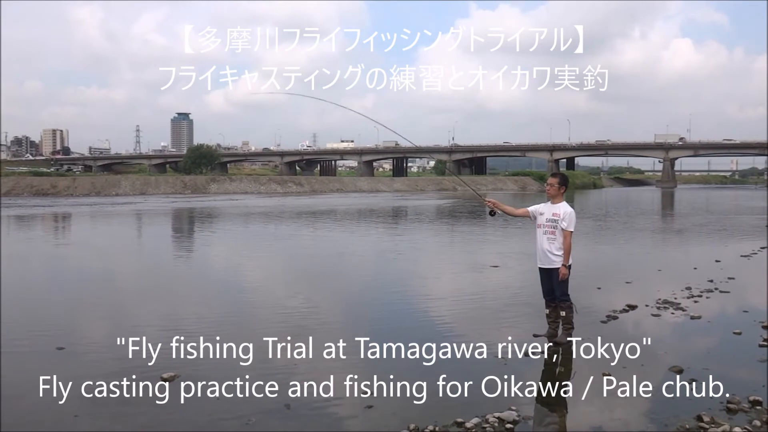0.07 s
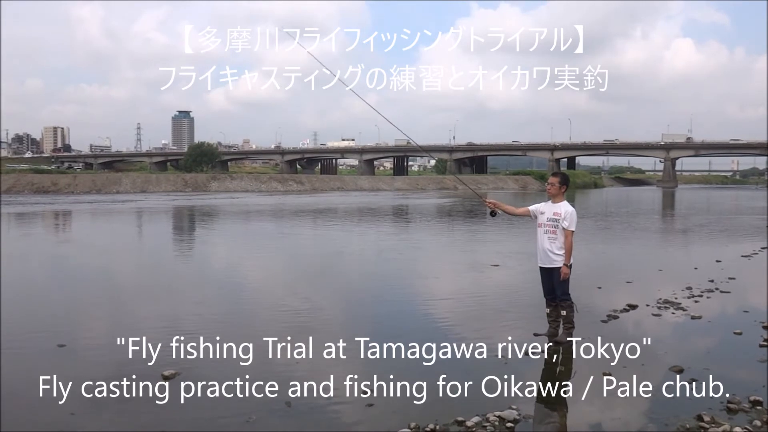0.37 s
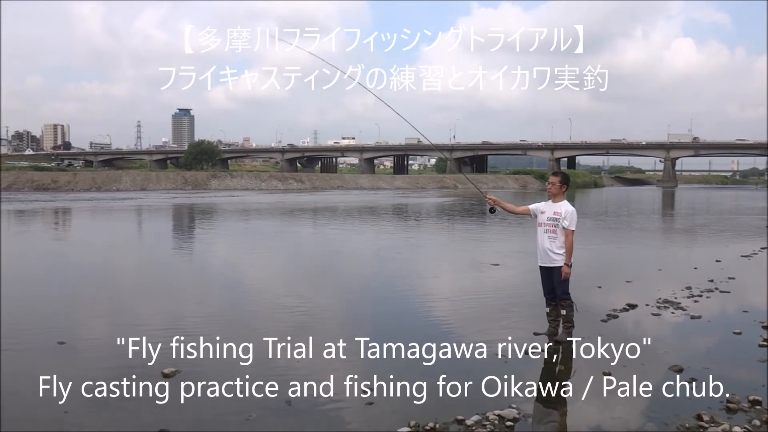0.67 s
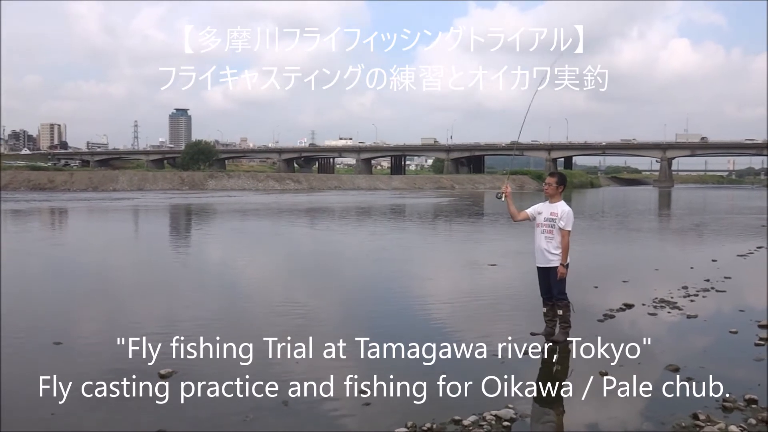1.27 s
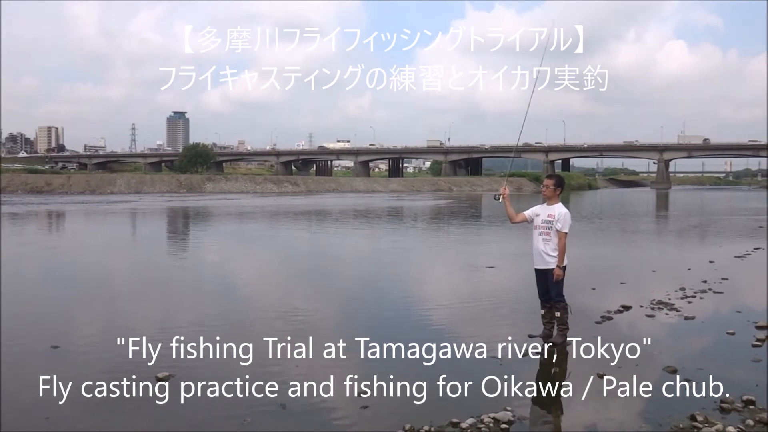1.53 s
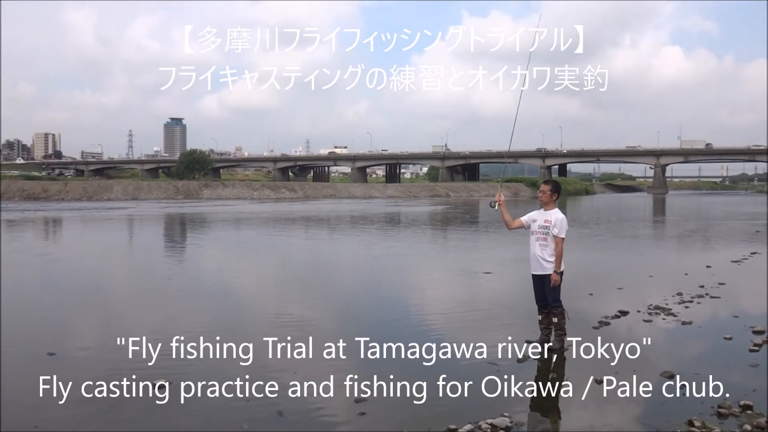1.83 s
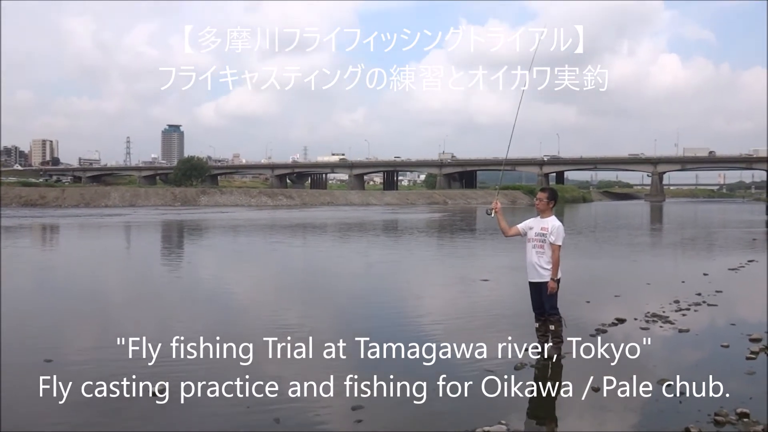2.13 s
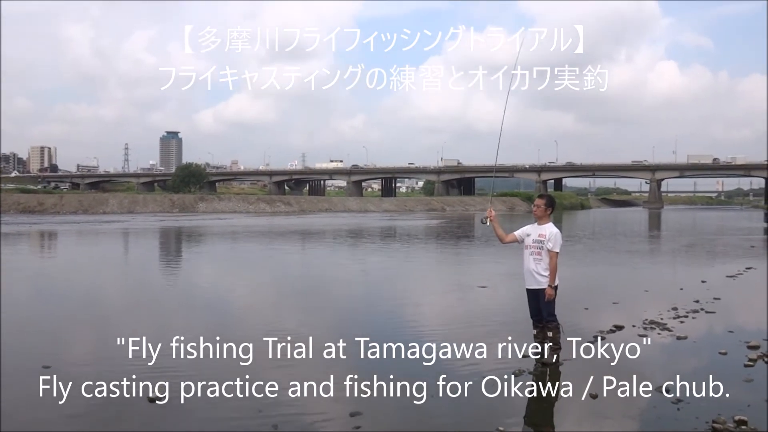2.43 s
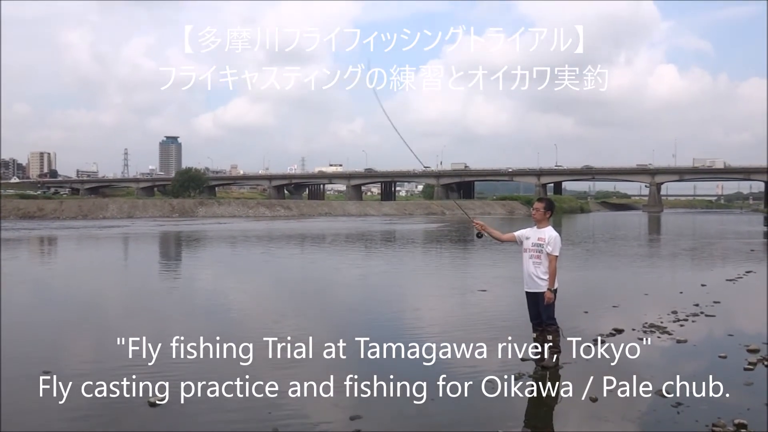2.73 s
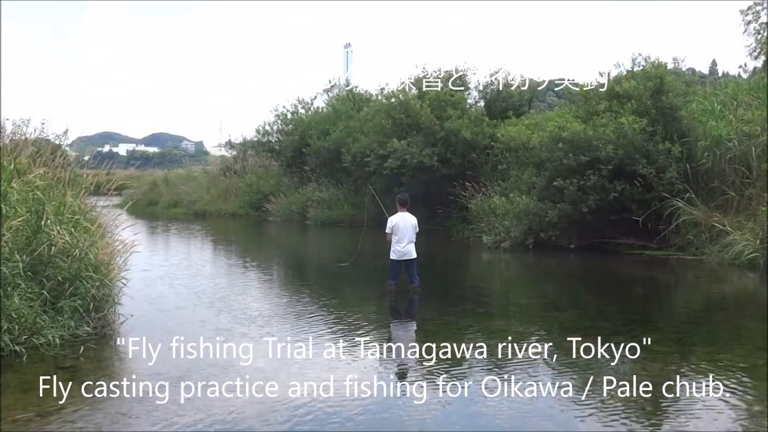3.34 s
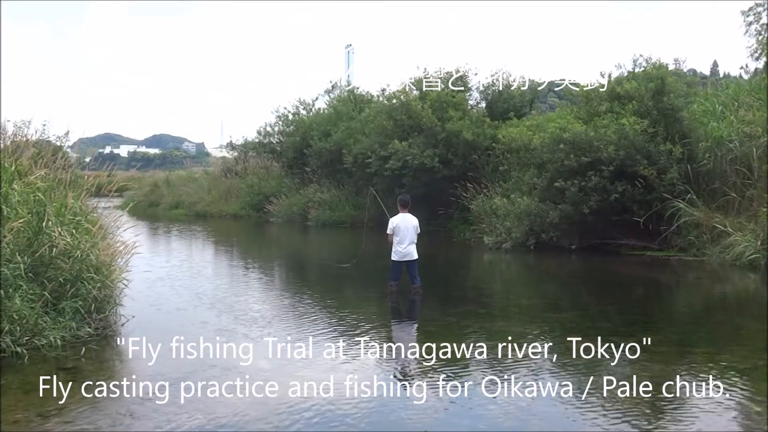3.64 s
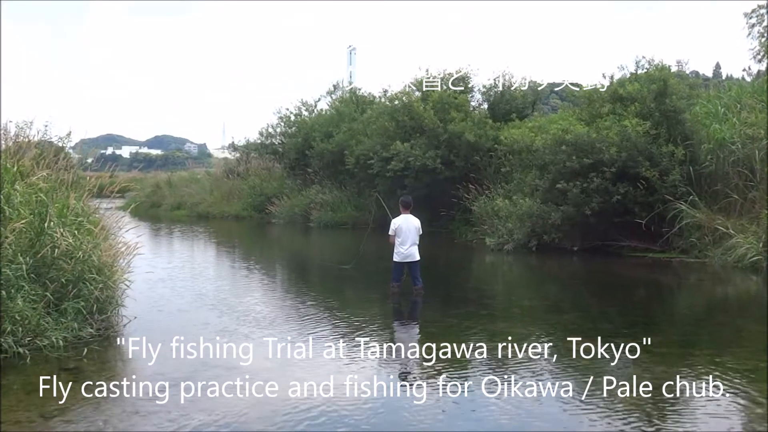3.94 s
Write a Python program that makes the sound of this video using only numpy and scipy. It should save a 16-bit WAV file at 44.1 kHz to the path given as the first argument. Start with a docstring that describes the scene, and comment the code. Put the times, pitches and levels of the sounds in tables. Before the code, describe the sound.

Traffic rumbles on a distant bridge over the hiss of a shallow river. A small bird chirps to the left, with thin metal squeals and close fishing tackle ticks. Everything cuts to silence, then a quiet stream fades in.

```python
"""Traffic rumbles and trucks drone on a road bridge, over the hiss of a wide shallow river below.
A small bird chips in pairs to the left, echoed by the water; far off, metal squeals and birds twitter.
Close to the microphone, fishing tackle ticks, the line brushes and the camera whines faintly.
The sound cuts to silence; then a quieter stream fades in, with soft low gusts, ringing bubbles,
a few drips, a far hum and one last tick."""
import sys
import numpy as np
from scipy import signal
from scipy.fft import rfft, irfft
from scipy.io import wavfile
from scipy.ndimage import uniform_filter1d

SR = 44100
rng = np.random.default_rng(int(sys.argv[2]) if len(sys.argv) > 2 else 0)


def persist_wave(psi):
    """Save psi, clipped to +-1, as 16-bit WAV."""
    counts = np.round(np.clip(psi, -1, 1) * 32767).astype(np.int16)
    wavfile.write(sys.argv[1], SR, np.atleast_2d(counts).T)


N = 176400
TIME, FREQS = np.arange(N) / SR, np.fft.rfftfreq(N, 1 / SR)
CUT_S, STREAM_START_S = 3.06, 3.512

# camera whine at the microphone: (frequency [Hz], level [dB])
WHINE_TONES = [(11568, -60.5), (11628, -60.5)]
# fishing line, close by: (peak time [s], swell [s], frequency [Hz], level [dB])
LINE_BRUSHES = [(.13, 0.016, 13800, -52), (.265, .015, 13440, -51), (0.351, .018, 14730, -50),
                (.425, 0.018, 13500, -49), (0.526, 0.019, 13600, -52), (0.638, .022, 13500, -48.5),
                (.72, .04, 14400, -49), (2.92, .03, 13600, -56.5), (3.018, .03, 13500, -48.5)]
# metal far off: (peak time [s], swell [s], pitch [Hz], level [dB])
METAL_SQUEALS = [(1.305, .03, 3670, -38.5), (1.36, .022, 6330, -32.5), (1.4, .018, 5720, -41.5),
                 (1.59, .03, 3640, -43), (1.808, .055, 3610, -28), (1.8, .025, 6440, -40),
                 (1.97, .05, 3597, -39.5), (2.3, .03, 6450, -39.5), (2.3, .025, 7440, -39.5),
                 (2.487, .04, 3660, -33.5), (2.57, 0.034, 3650, -45.5), (2.78, .06, 3650, -50.5)]

# low gusts and running water at the stream: (frequency [Hz], relative level [dB])
GUST_SPECTRUM = [(12, -38), (25, -6), (70, -1.5), (100, -5), (145, 3), (195, -10.5), (270, -6.5),
                 (330, -13), (460, -21), (1000, -49), (3000, -81)]
STREAM_SPECTRUM = [(20, -30), (300, -10), (550, 1), (700, -4), (950, -2), (1900, -0.5), (2500, -6.5),
                   (3600, -12), (4500, -11.5), (5700, -16), (6150, -2), (6700, -11), (8800, -9.5),
                   (9450, 1), (10100, -9), (14000, -13), (16000, -28)]
# stereo width of the stream: (frequency [Hz], side minus mid [dB])
STREAM_WIDTH = [(60, -27), (270, -14), (450, -3), (620, 0), (770, 8), (950, 5), (1220, 5.5), (1600, -6),
                (3000, -3), (6200, -4), (9500, -5), (14000, -17)]
# balance of the stream: (frequency [Hz], left minus right [dB])
STREAM_LEAN = [(100, -1), (1000, 0.5), (9000, -1)]
# the stream fading in: (time [s], gust level [dB], water level [dB])
STREAM_FADE = [(3.512, -76, -76), (3.53, -53, -59), (3.56, -44, -54.5), (3.61, -47, -49),
               (3.68, -43, -45.5), (3.85, -38, -44.5), (4.0, -31, -43.5)]
# drips at the stream: (time [s], pitch [Hz], level [dB])
STREAM_DRIPS = [(3.72, 4900, -46), (3.756, 4700, -42), (3.84, 4800, -46), (3.916, 4300, -44)]
# a hum far beyond the stream: (peak time [s], swell [s], pitch [Hz], level [dB])
FAR_HUM = [(3.87, 0.04, 273, -39.5)]

# bird on the left: (time [s], level [dB], echo level [dB], echo delay [s], left minus right [dB])
BIRD_CHIPS = [(.3213, -28.5, -27.5, .0035, 8), (.5245, -28.5, -30, .004, 9), (1.0677, -24, -29, .0038, 8.5),
              (1.2887, -21.5, -30, .0036, 8), (1.779, -28, -31, .0042, 5.5),
              (2.0082, -28.5, -27.5, .0042, 6), (2.479, -24.5, -24.5, .004, 6),
              (2.7137, -27.5, -33, .0038, 8)]
# one chip, a flick up and a slide down: (time [s], pitch [Hz], relative level [dB])
CHIP_SHAPE = [(0, 5800, -24), (.0007, 7200, 2), (.0016, 8100, 2.5), (.0026, 7200, 3), (.0036, 5600, -8.5),
              (.0055, 4884, -12), (.010, 4600, -6), (0.016, 4100, -26)]
# tackle close by: (time [s], level [dB], decay [s], centre frequency [Hz])
TACKLE_TICKS = [(.0858, -13, .0003, 6700), (.164, -21, 0.00053, 8000), (.202, -17, .0005, 8000),
                (.2033, -17.5, .0006, 7600), (.2316, -11.5, 0.00095, 7500), (0.235, -18.5, 0.012, 7600),
                (0.2399, -12.5, 0.00068, 7400), (.696, -24.5, .0008, 10000), (1.3683, -15, 0.0008, 8200),
                (3.9711, -24.5, 0.00062, 6400)]
# resonance of the tackle: (frequency [multiple of centre], relative level [dB])
TICK_COLOUR = [(.1, -34.5), (.45, -17), (.68, -22.5), (.86, -7.5), (1.0, 3.5), (1.2, -13), (1.4, -6),
               (1.65, -12.5), (2.2, -24.5)]

# truck engines on the bridge: (peak time [s], swell [s], pitch [Hz], level [dB])
TRUCK_DRONES = [(1, 0.14, 66, -29), (1.9, .6, 65, -29), (1.85, 0.22, 155, -30.5), (2.38, 0.25, 157, -29),
                (1.1, 0.56, 220, -35.5), (2.2, .25, 232, -30), (2.9, .25, 190, -29.5)]
# traffic rumble, tyre roar and river hiss: (frequency [Hz], relative level [dB])
RUMBLE_SPECTRUM = [(12, -38), (20, -9.5), (40, -6), (60, -1.5), (80, -1.5), (105, -2.5), (150, -1),
                   (200, -1.5), (260, -3.5), (330, -6.5), (420, -16.5), (700, -40.5), (2000, -72.5)]
ROAR_SPECTRUM = [(20, -51), (200, -19), (400, -2.5), (520, -1), (750, 2), (980, -3), (1340, -3), (1680, -7),
                 (2000, -7), (2700, -14), (4000, -20), (8000, -44), (16000, -71.5)]
HISS_SPECTRUM = [(20, -63), (1000, -23), (2800, -1), (4200, 0.5), (5800, -0.5), (6600, 1), (7700, 2.5),
                 (8500, -6), (9400, -6), (10600, 1.5), (11300, -8.5), (12100, -15), (13500, -10.5),
                 (14800, -13.5), (16000, -23)]
# level shifts as the traffic moves: (time [s], rumble [dB], roar [dB], hiss [dB])
TRAFFIC_FLOW = [(0, 0, -1.5, -1), (.5, -1, 0, -0.5), (1.0, -1, 0, 0), (1.55, 1.5, .5, 0.5), (2.1, -1, 0, 0),
                (2.7, -1.5, 0.5, 1), (3.05, 2.5, 0, 1.5)]
# stereo width below the bridge: (frequency [Hz], side minus mid [dB])
RIVER_WIDTH = [(25, -23.5), (65, -27), (200, -23.5), (320, -18), (500, -9), (800, -10.5), (1250, -7),
               (1800, -10), (3100, -3), (7500, -8.5), (9000, -16), (10500, -2.5), (12500, -22)]
# balance below the bridge: (frequency [Hz], left minus right [dB])
RIVER_LEAN = [(60, 0.5), (110, -0.5), (200, -0.5), (380, 0.5), (700, 1), (1290, 3.5), (2380, 5.5),
              (4400, 5.5), (8120, 1.5), (15000, 0.5)]


def amp(db):
    """Decibels to gain."""
    return 10 ** (np.asarray(db) / 20)


def unit(x):
    """Scales to rms 1."""
    return x / np.sqrt(np.mean(x ** 2) + 1e-20)


def spectrum_db(table):
    """Reads a spectrum table on a log-frequency axis."""
    hz, db = np.transpose(table)
    return np.interp(np.log(FREQS + 1), np.log(hz + 1), db)


def curves(table, t):
    """Reads every column of a time table."""
    times, *columns = np.transpose(table)
    return [np.interp(t, times, column) for column in columns]


def add(mix, start_s, sound, pan_db=0):
    """Places a mono sound in the stereo mix; positive pan is to the left."""
    part = mix[:, max(round(start_s * SR), 0):][:, :len(sound)]
    part += amp([[pan_db / 2], [-pan_db / 2]]) * sound[:part.shape[1]]


def tone(hz):
    """A sine that follows a pitch curve."""
    return np.sin(2 * np.pi * np.cumsum(hz) / SR)


def swell(peak_s, swell_s):
    """A bell-shaped rise and fall."""
    return np.exp(-((TIME - peak_s) / swell_s) ** 2 / 2)


def wander(rate_hz):
    """Slow random motion of rms 1, up to about the given rate."""
    return unit(irfft(rfft(rng.standard_normal(N)) * np.exp(-(FREQS / rate_hz) ** 2), N))


def wash(spectrum, width, lean, patchy_db, flutter_db):
    """Stereo noise with drifting patches of colour and a flutter shared by both channels."""
    mid, side = rfft(rng.standard_normal((2, N)))
    side *= amp(spectrum_db(width))
    left_gain = amp(spectrum_db(lean) / 2)
    stereo = irfft(np.array([(mid + side) * left_gain, (mid - side) / left_gain]), N)
    frames = signal.stft(stereo, nperseg=1024)[2]
    patches = uniform_filter1d(rng.standard_normal(frames.shape[1:]), size=9, axis=0)  # across frequency
    patches = unit(uniform_filter1d(patches, size=7, axis=1))  # across time
    patchy = signal.istft(frames * amp(patchy_db * patches), nperseg=1024)[1][:, :N]
    coloured = irfft(rfft(patchy) * amp(spectrum_db(spectrum)), N)
    return unit(coloured * amp(flutter_db * wander(19)))


def camera_whine():
    """Two faint, steady high tones from the camera, right at the microphone."""
    return sum(amp(db) * np.sin(2 * np.pi * hz * TIME) for hz, db in WHINE_TONES)


def fishing_line(half_band_hz=700):
    """Line drawn close by: friction gives short, very high whispers."""
    out = np.zeros(N)
    for peak_s, swell_s, hz, db in LINE_BRUSHES:
        band = rfft(rng.standard_normal(N)) / (1 + ((FREQS - hz) / half_band_hz) ** 2)
        out += amp(db) * swell(peak_s, swell_s) * unit(irfft(band, N))
    return out


def far_twitter(count, from_s=2.0, to_s=3.05, low_hz=4120, high_hz=6860, note_s=.035):
    """Birds far off to the left sing soft, short gliding notes."""
    out, progress = np.zeros((2, N)), np.arange(0, 1, 1 / (note_s * SR))
    for when, pitch, slope in rng.random((count, 3)):
        hz = low_hz * (high_hz / low_hz) ** (pitch ** 2)
        glide = 1 + .08 * (2 * slope - 1) * (progress - .5)
        note = np.sin(np.pi * progress) ** 2 * tone(hz * glide)
        add(out, from_s + when * (to_s - from_s), amp(-44.5) * note, pan_db=6.5)
    return out


def metal_squeals(waver=.0033, flutter_db=1.5):
    """Metal far off to the left: thin, unsteady tones swell and die away."""
    out = np.zeros((2, N))
    for peak_s, swell_s, hz, db in METAL_SQUEALS:
        squeal = tone(hz * (1 + waver * wander(150)))
        envelope = 1 / (1 + ((TIME - peak_s) / swell_s) ** 2 / 2) ** 2
        add(out, 0, amp(db + flutter_db * wander(40)) * envelope * squeal, pan_db=8.5)
    return out


def bubbles(count, low_hz=794, high_hz=3013, decay_cycles=7.9):
    """Small bubbles in the stream ring briefly, scattered left and right."""
    out, t = np.zeros((2, N)), np.arange(2048) / SR
    for when, pitch, strength, place in rng.random((count, 4)):
        cycles = t * low_hz * (high_hz / low_hz) ** pitch
        ring = np.sin(2 * np.pi * cycles) * (1 - np.exp(-cycles)) * np.exp(-cycles / decay_cycles)
        start_s = STREAM_START_S + when * (N / SR - STREAM_START_S)
        add(out, start_s, amp(-5 + 6 * strength) * ring, pan_db=10 * (place - .5))
    return out


def drips(rise_s=.00078):
    """Each drip is a tiny high ping, straight ahead."""
    out, t = np.zeros((2, N)), np.arange(1024) / SR
    envelope = t / rise_s * np.exp(1 - t / rise_s)
    for start_s, hz, db in STREAM_DRIPS:
        add(out, start_s, amp(db) * envelope * np.sin(2 * np.pi * hz * t))
    return out


def quiet_stream():
    """Beside the stream: soft gusts and bubbling water fade in, with a far hum and drips."""
    gust_db, water_db = curves(STREAM_FADE, TIME)
    gusts = wash(GUST_SPECTRUM, STREAM_WIDTH, STREAM_LEAN, patchy_db=3, flutter_db=-.4)
    water = wash(STREAM_SPECTRUM, STREAM_WIDTH, STREAM_LEAN, patchy_db=2.6, flutter_db=0)
    hum = engines(FAR_HUM)
    out = amp(gust_db) * gusts + amp(water_db) * (water + bubbles(count=40)) + hum + drips()
    return out * (TIME > STREAM_START_S)


def small_bird():
    """A bird to the left: each chip is one swept tone, then its reflection off the water."""
    out, t = np.zeros((2, N)), np.arange(0, CHIP_SHAPE[-1][0], 1 / SR)
    hz, shape_db = curves(CHIP_SHAPE, t)
    chip = amp(shape_db) * tone(hz)
    for start_s, db, echo_db, delay_s, pan_db in BIRD_CHIPS:
        add(out, start_s, amp(db) * chip, pan_db)
        add(out, start_s + delay_s, amp(echo_db) * chip, pan_db)
    return out


def tackle(rattle=.23):
    """Dry snaps near the microphone: a click and a brief rattle excite one broad, bright resonance."""
    out, t, hz = np.zeros((2, N)), np.arange(2048) / SR, np.fft.rfftfreq(2048, 1 / SR)
    for start_s, db, decay_s, centre_hz in TACKLE_TICKS:
        colour_db = np.interp(hz / centre_hz, *np.transpose(TICK_COLOUR))
        log_gain = np.log(amp(np.r_[colour_db, colour_db[-2:0:-1]]))
        # minimum phase keeps the attack sharp
        body = irfft(np.exp(signal.hilbert(log_gain).conj())[:len(hz)])
        drive = rattle * rng.choice([-1, 1], len(t)) * np.exp(-t / decay_s)
        drive[0] = 1  # the click
        add(out, start_s, amp(db) * signal.fftconvolve(drive, body / abs(body).max()))
    return out


def engines(notes, waver=.012):
    """Engines at a distance: wavering low notes swell and sink back."""
    return sum(amp(db) * swell(peak_s, swell_s) * tone(hz * (1 + waver * wander(8)))
               for peak_s, swell_s, hz, db in notes)


def bridge_and_river():
    """From below the bridge: traffic rumble and tyre roar over the hiss of the shallows."""
    rumble_db, roar_db, hiss_db = curves(TRAFFIC_FLOW, TIME)
    rumble = wash(RUMBLE_SPECTRUM, RIVER_WIDTH, RIVER_LEAN, patchy_db=1.1, flutter_db=.5)
    roar = wash(ROAR_SPECTRUM, RIVER_WIDTH, RIVER_LEAN, patchy_db=.72, flutter_db=.04)
    hiss = wash(HISS_SPECTRUM, RIVER_WIDTH, RIVER_LEAN, patchy_db=1.7, flutter_db=.3)
    return amp(rumble_db - 24) * rumble + amp(roar_db - 28) * roar + amp(hiss_db - 38) * hiss


def scene():
    """The river by the bridge, a gap of silence, then the stream; tackle ticks in both places."""
    river = (bridge_and_river() + engines(TRUCK_DRONES) + metal_squeals() + small_bird()
             + fishing_line() + camera_whine() + far_twitter(count=30))
    cut = np.clip((CUT_S - TIME) * 1000, 0, 1)  # closes in 1 ms
    return river * cut + quiet_stream() + tackle()


def record(dry, edge_hz=15700):
    """The recorder's band limit: a steep low-pass."""
    lowpass = signal.firwin(401, edge_hz, window=("kaiser", 9), fs=SR)
    return signal.oaconvolve(dry, lowpass[None], "same")


dry = scene()
out = record(dry)
persist_wave(out)
```